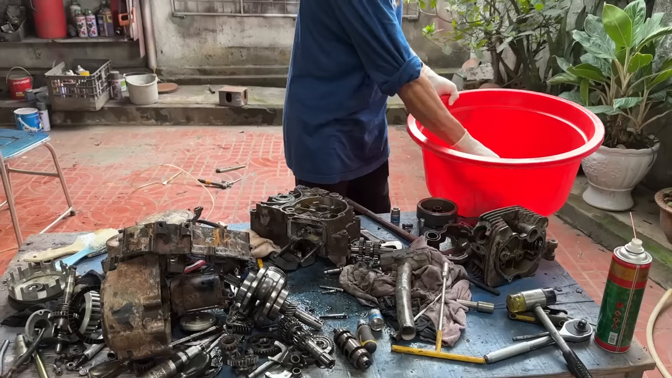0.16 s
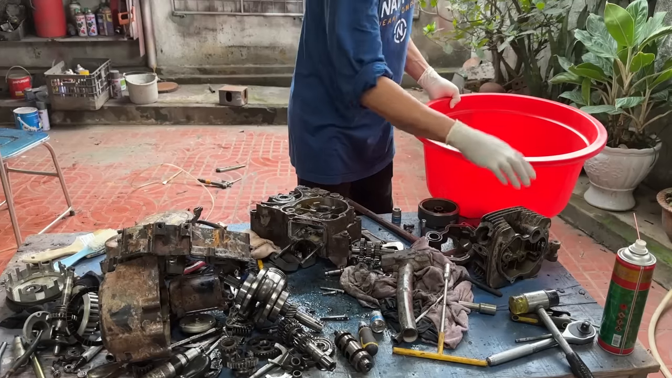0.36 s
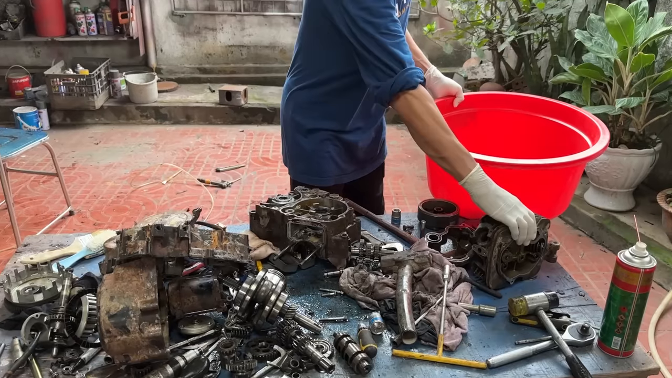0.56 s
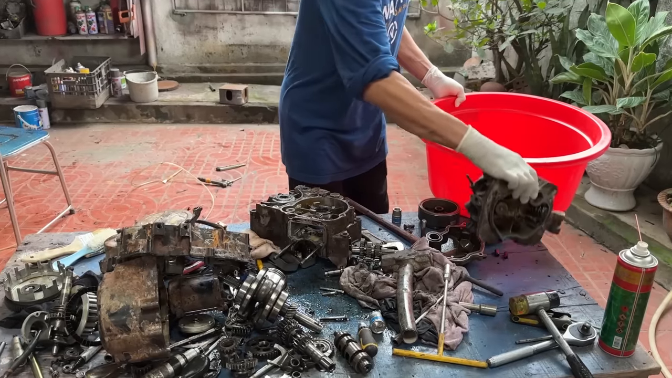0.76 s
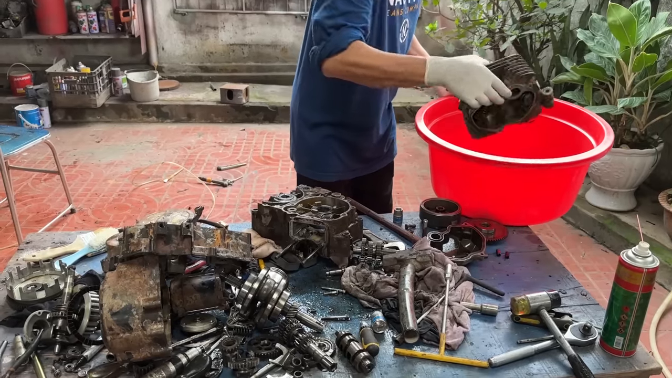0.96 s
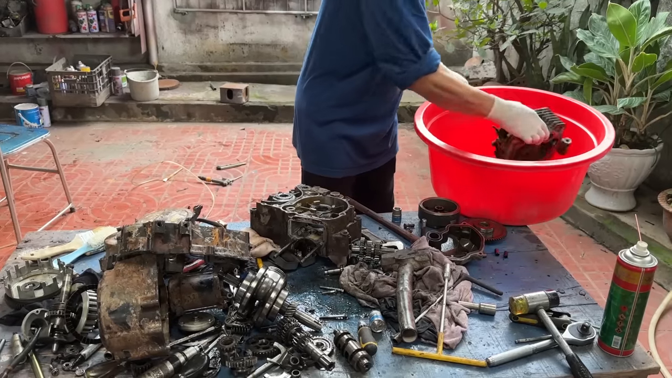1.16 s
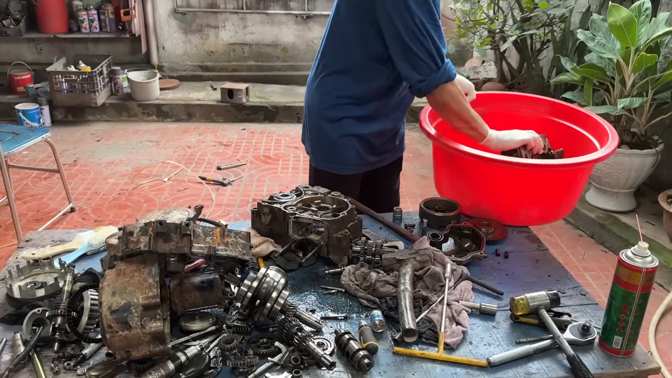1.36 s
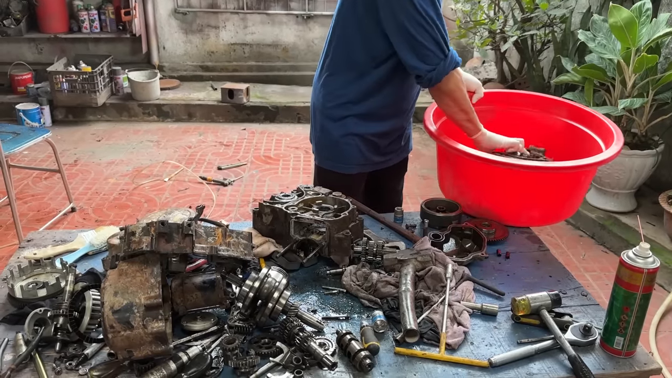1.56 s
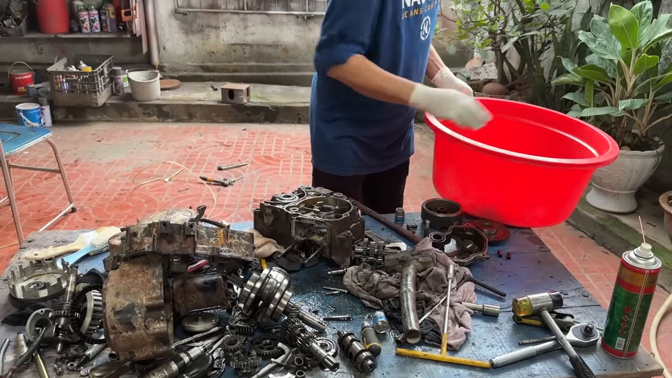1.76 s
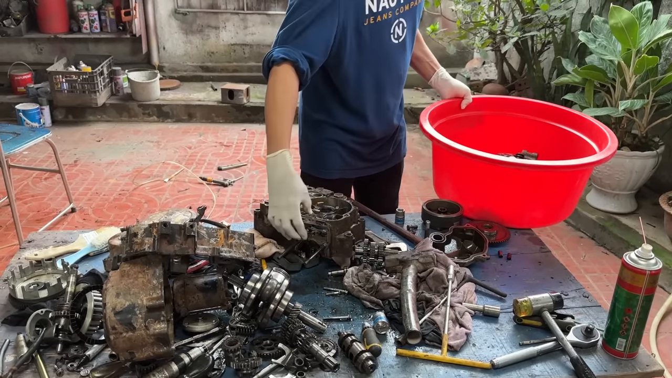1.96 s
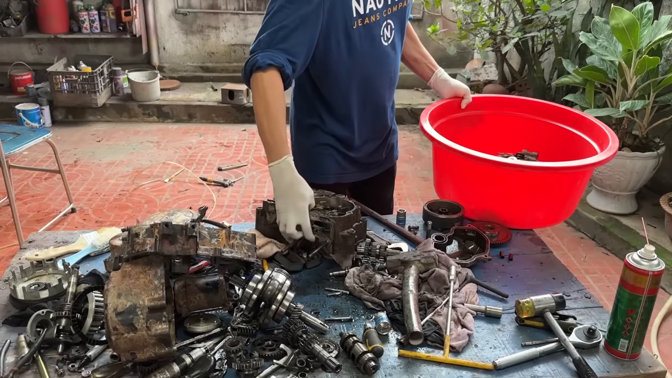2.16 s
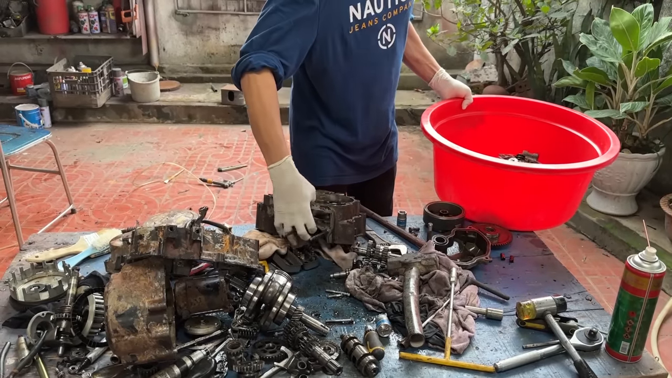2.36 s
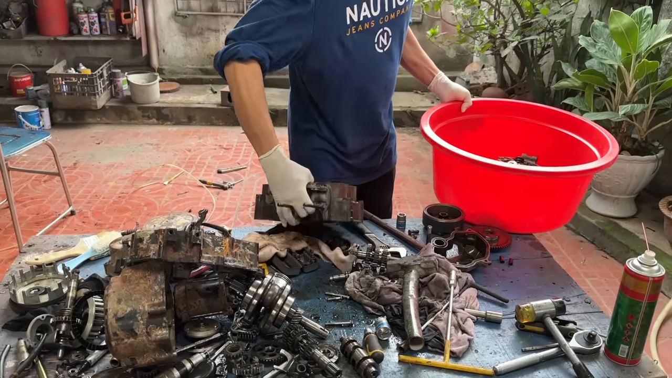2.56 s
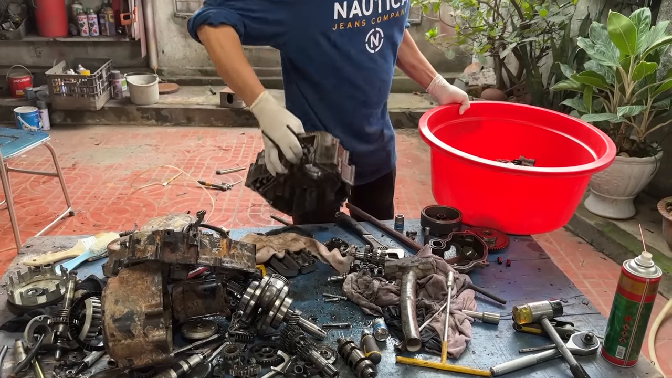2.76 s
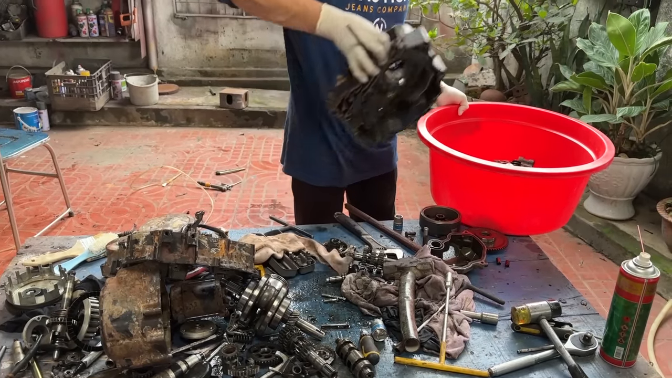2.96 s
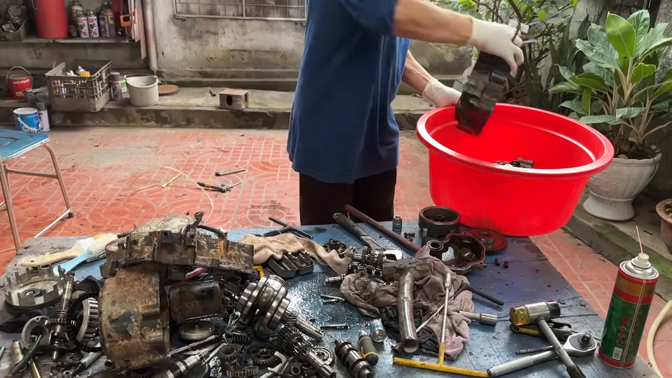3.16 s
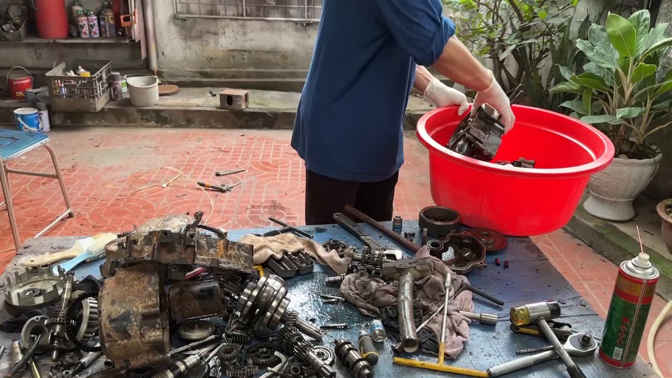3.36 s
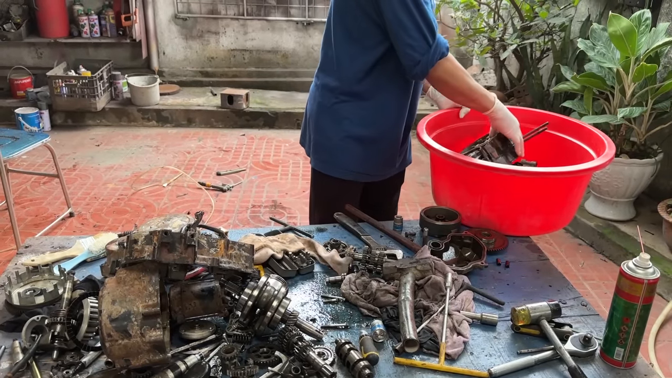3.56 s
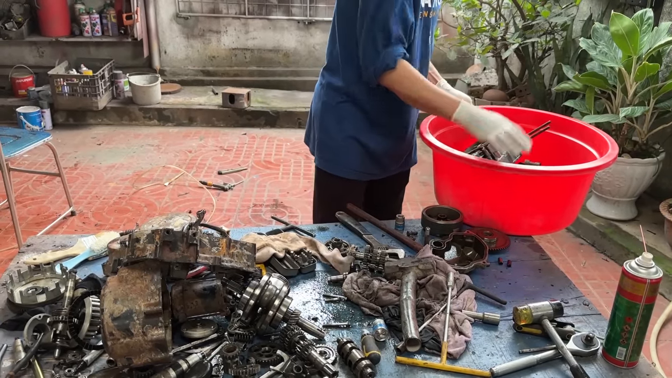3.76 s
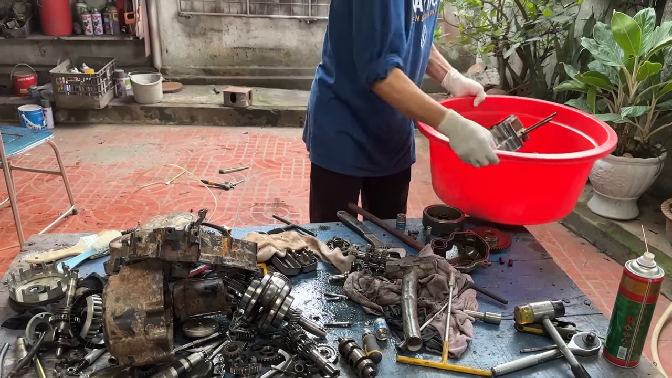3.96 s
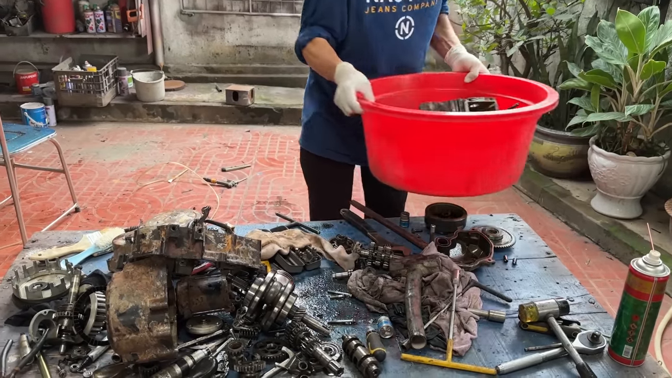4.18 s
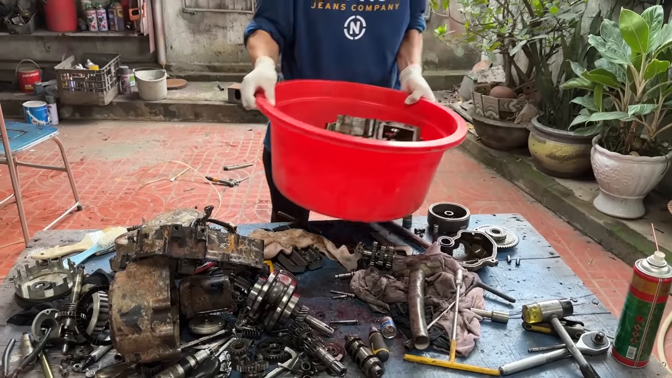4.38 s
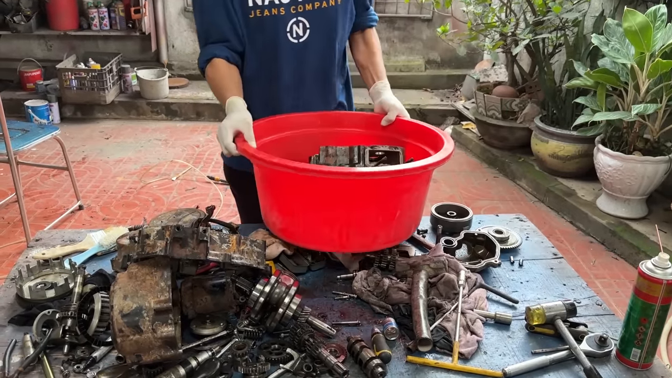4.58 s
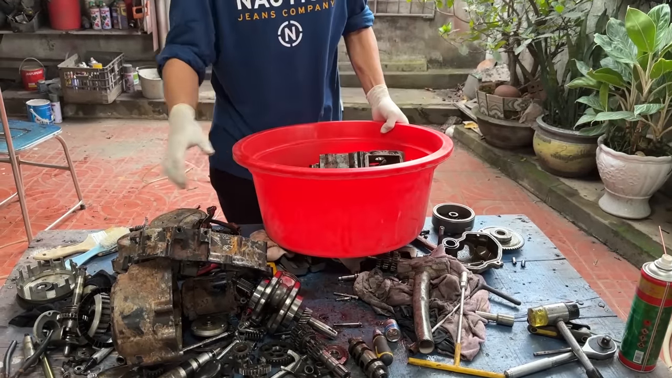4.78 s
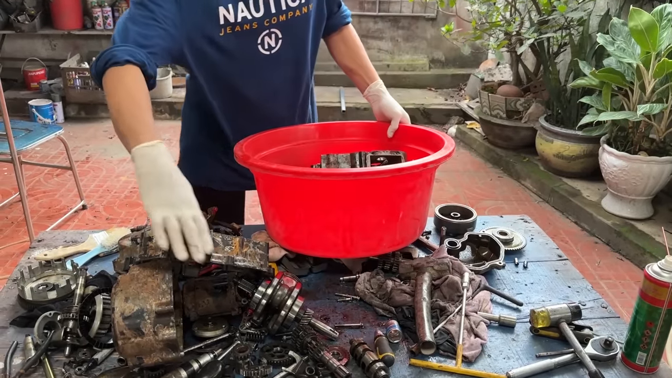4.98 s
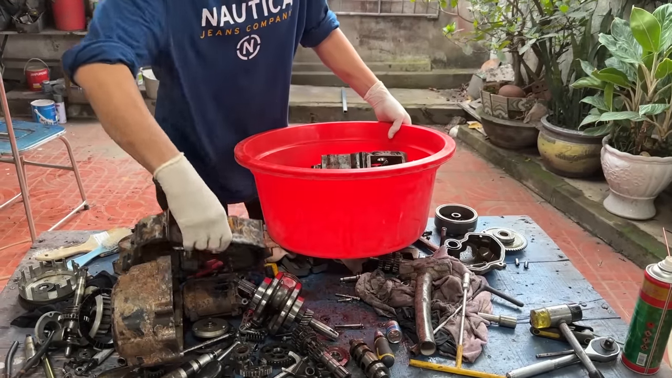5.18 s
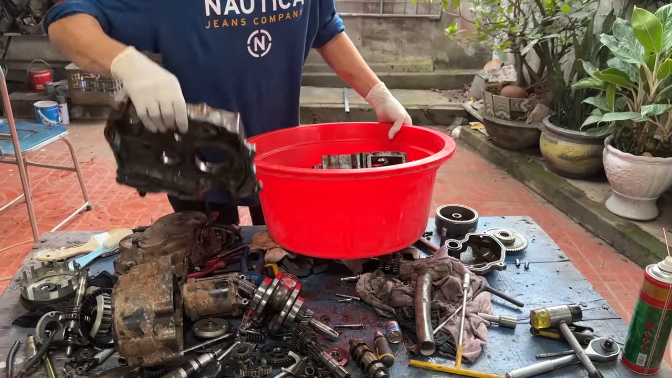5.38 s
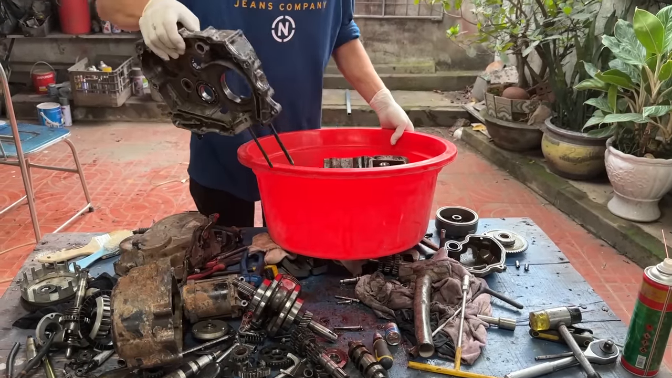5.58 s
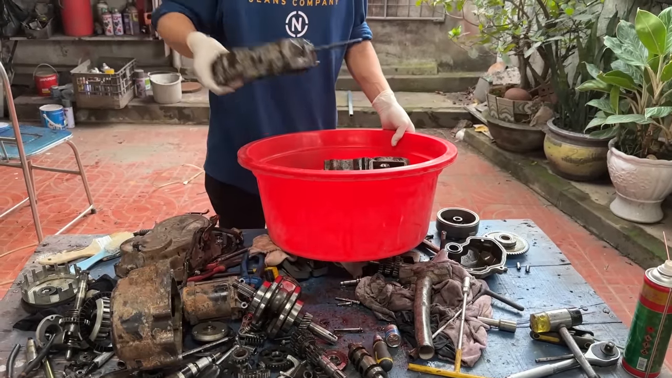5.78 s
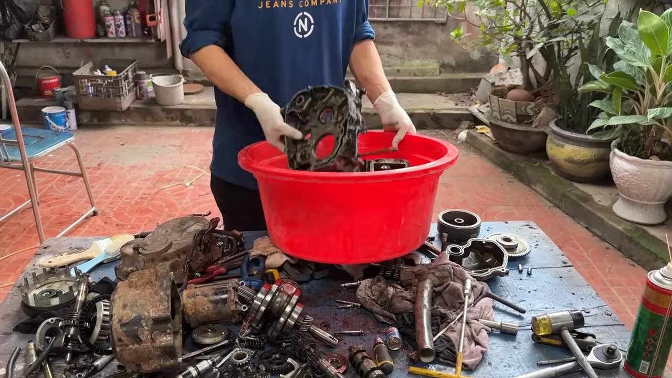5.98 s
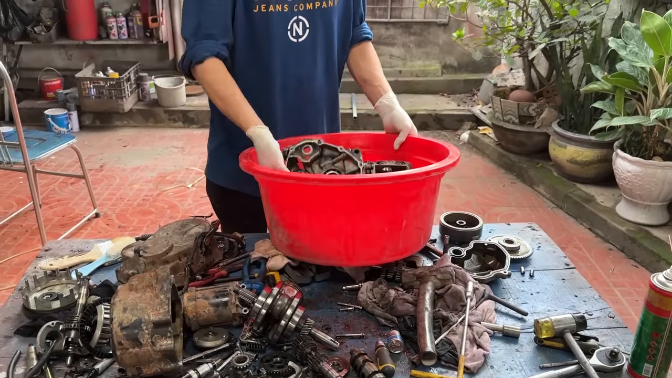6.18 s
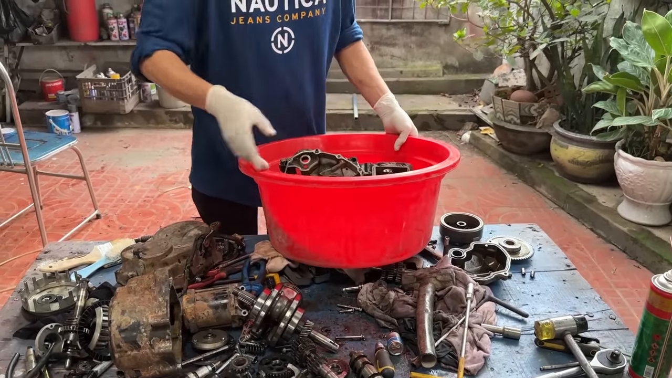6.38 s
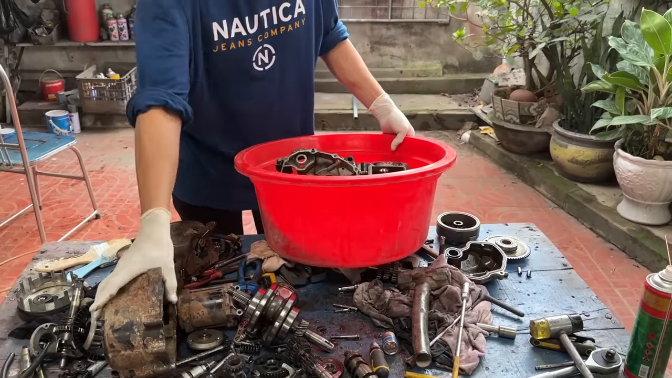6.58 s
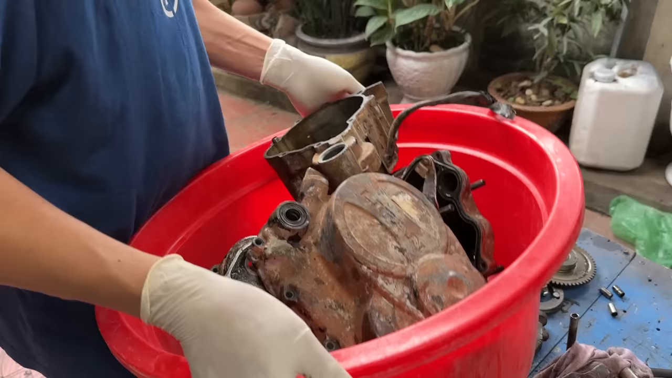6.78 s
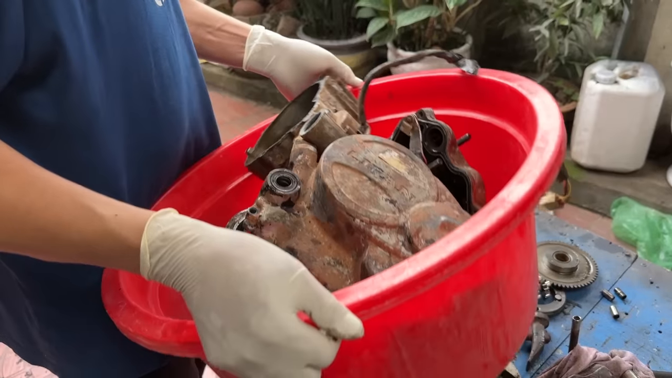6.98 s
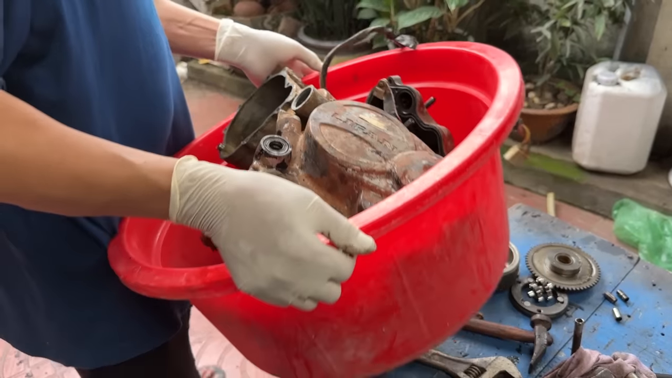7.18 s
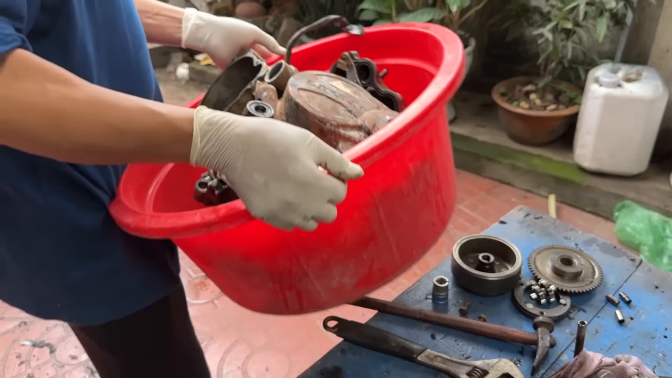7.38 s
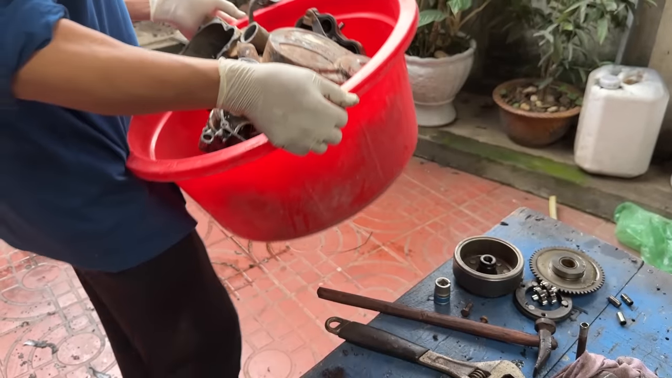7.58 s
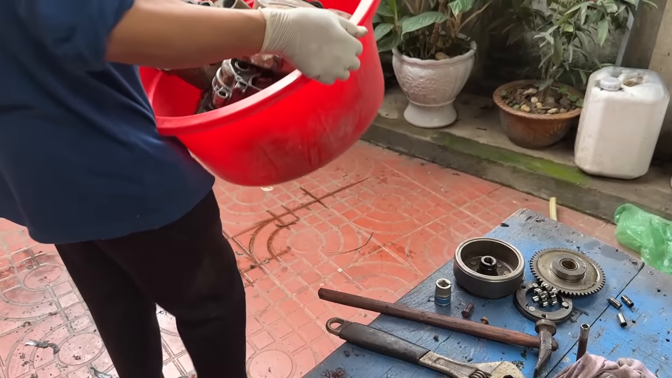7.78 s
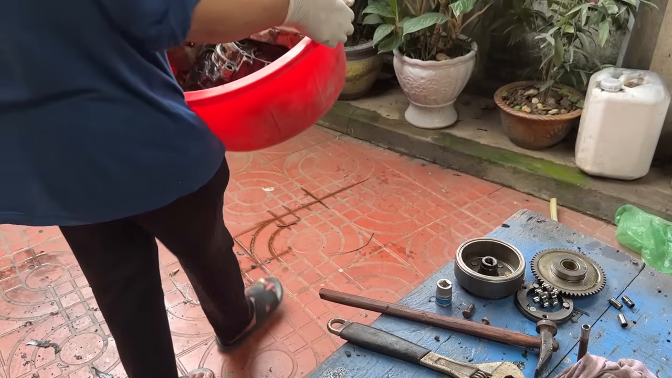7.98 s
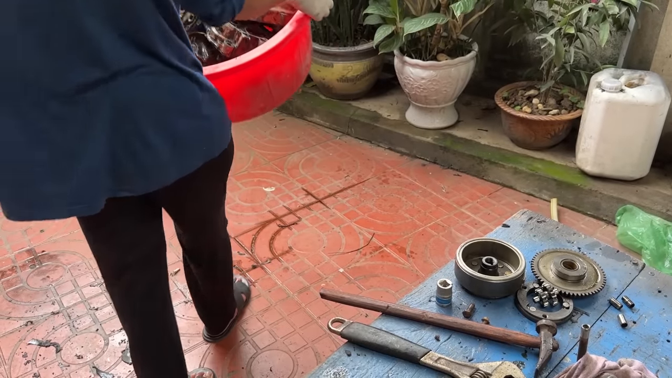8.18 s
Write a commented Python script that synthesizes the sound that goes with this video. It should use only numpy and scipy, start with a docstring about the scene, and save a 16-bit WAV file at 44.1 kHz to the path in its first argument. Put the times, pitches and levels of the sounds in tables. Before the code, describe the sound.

Hard metal knocks and hollow plastic booms as engine parts are lifted from a cluttered bench into a tub outdoors, then a brief squeal and faint scuff.

```python
"""Greasy engine castings are lifted off a cluttered workbench and loaded into a plastic basin, in a walled yard.
Each blow is a noise crack plus the dense modes of cast metal; the basin booms, and a stud, a gear and covers
ring on as decaying sines. Parts scrape in runs of tiny slips, grit ticks, and far birds chirp as wavering tones.
Near the end a thin squeal of beating tones begins; at 6.825 s the scene cuts from yard air to low rumbling noise
over a thin hiss, as also heard at the very start. Blows go on briefly, then a sole scuffs the paving."""
import sys
import numpy as np
from scipy import signal
from scipy.fft import rfft, irfft, next_fast_len
from scipy.io import wavfile
from scipy.ndimage import uniform_filter1d

SR = 44100
rng = np.random.default_rng(int(sys.argv[2]) if len(sys.argv) > 2 else 0)


def transcribe(signal):
    """Save signal, clipped to [-1, 1], as a 16-bit WAV file at the path in sys.argv[1]."""
    frames = np.atleast_2d(signal).T
    limited = np.clip(frames, -1, 1)
    pcm = np.round(limited * 32767).astype(np.int16)
    wavfile.write(sys.argv[1], SR, pcm)


N = 363366
T = np.arange(SR * 3 // 8) / SR  # clock of one blow, in seconds
LN_60_DB = np.log(1000)
DROPOUT_START_S, DROPOUT_END_S = 0.133, 0.16


def amp(db):
    """Decibels to gain."""
    return 10 ** (np.asarray(db) / 20)


def evened(x):
    """Scales to rms 1."""
    return x / np.sqrt(np.mean(x ** 2) + 1e-20)


def read(points, hz):
    """Reads a table on a log-frequency axis."""
    f, value = np.transpose(points)
    return np.interp(np.log(hz + 1), np.log(f + 1), value)


def level(events, rise_s, fall_s):
    """Gain from rows of start_s, length_s, level_db: each rises, holds, then falls 60 dB in fall_s."""
    t = np.arange(N) / SR
    gains = []
    for start_s, length_s, level_db in events:
        rise = np.clip((t - start_s) / rise_s, 0, 1)
        fall = np.exp(-LN_60_DB * np.maximum(t - start_s - length_s, 0) / fall_s)
        gains.append(amp(level_db) * rise * fall)
    return np.max(gains, axis=0)


def fade(t60):
    """Exponential decay over the length of one blow, falling 60 dB in t60 seconds."""
    return np.exp(-LN_60_DB * T / np.maximum(t60, 1e-3))


def add(mix, start_s, sound):
    """Mixes a mid-side sound in at start_s."""
    part = mix[:, max(round(start_s * SR), 0):][:, :sound.shape[1]]
    part += sound[:, :part.shape[1]]


def coloured(x, points):
    """Filters by a spectrum with rows of pitch_hz, level_db."""
    size = next_fast_len(N + SR // 2)
    gain = amp(read(points, np.fft.rfftfreq(size, 1 / SR)))
    return irfft(rfft(x, size) * gain, size)[..., :N]


def wander(count, size):
    """Smooth chance of rms 1 that changes over about size samples."""
    smooth = uniform_filter1d(rng.standard_normal(count), size)
    return evened(uniform_filter1d(smooth, size))


# air of the yard: pitch_hz, relative level_db per Hz
YARD_COLOUR = [(30, -45.5), (64, -11.5), (138, -4), (170, -13), (437, -19), (700, -25.5), (1760, -34),
               (3220, -34.5), (6900, -39.5), (14400, -38), (16000, -54)]
# level of the yard air, before it drifts: start_s, level_db
YARD_LEVEL = [(.3, -55.5), (1.15, -59.5), (2.1, -55.5), (3.2, -57.5), (4.8, -54.5), (6.8, -53.5)]
# spectrum of the low rumble: pitch_hz, relative level_db per Hz
RUMBLE_COLOUR = [(22, -28.5), (80, 3.5), (123, -11.5), (200, -14.5), (326, -18.5), (416, -23), (887, -25),
                 (1440, -33), (3620, -43.5), (6920, -43.5), (11000, -67.5)]
# swells of the rumble: start_s, length_s, level_db
RUMBLES = [(0, 0.11, -49.5), (6.79, 0.31, -36.5), (7.3, 0.37, -44.5), (8.06, 0.3, -45.5)]
# spectrum of the steady hiss under the rumble: pitch_hz, relative level_db per Hz
HISS_COLOUR = [(100, 19.5), (600, 3.5), (1600, 0), (3400, 2), (7000, -6), (11000, -24), (15000, -19)]
HISS_DB = -63
RUMBLE_RISE_S, RUMBLE_FALL_S = 0.019, 1.87
SCENE_CUT_S = 6.825  # from yard air to rumble and hiss


def background(drift_db=1.2):
    """Drifting noise of the yard air; at the very start and after the cut, low rumble over thin hiss instead."""
    t = np.arange(N) / SR
    air, rumble, hiss = (evened(coloured(rng.standard_normal((2, N)), colour))
                         for colour in (YARD_COLOUR, RUMBLE_COLOUR, HISS_COLOUR))
    air_db = np.interp(t, *np.transpose(YARD_LEVEL)) + drift_db * wander(N, size=3000)
    rumbling = rumble * level(RUMBLES, RUMBLE_RISE_S, RUMBLE_FALL_S) + amp(HISS_DB) * hiss
    return np.where((t > DROPOUT_START_S) & (t < SCENE_CUT_S), air * amp(air_db), rumbling)


def casting(ring_s, spread, count=380):
    """The crowded modes of an irregular casting, each dying at its own speed."""
    even_hz = np.linspace(np.sqrt(170), np.sqrt(16000), count) ** 2
    hz = even_hz * rng.uniform(.97, 1.03, count)
    t60 = ring_s * np.exp(spread * rng.standard_normal(count))
    turns = hz[:, None] * T + rng.random((count, 1))
    return np.sin(2 * np.pi * turns) * fade(t60[:, None])


# centres of thud, knock, clank and tick: pitch_hz
COLOUR_HZ = [430, 1100, 3100, 9400]
# a soft contact loses the treble above SOFT_HZ; full hardness lifts that corner by HARD_OCTAVES
SOFT_HZ, HARD_OCTAVES, ROLLOFF = 681, 4.575, 4.74


def contact(colour_db, strength_db, hardness):
    """Thud, knock, clank and tick (dB) of one blow: the harder the contact, the more treble it keeps."""
    corner_hz = SOFT_HZ * 2 ** (HARD_OCTAVES * hardness)
    softening_db = 10 * np.log10(1 + (np.array(COLOUR_HZ) / corner_hz) ** ROLLOFF)
    return strength_db + np.array(colour_db) - softening_db


BAND_EDGES = np.geomspace(120, 16000, 13)  # Hz
BANDS = [(np.sqrt(lo * hi), signal.butter(2, [lo, hi], "band", fs=SR, output="sos"))
         for lo, hi in zip(BAND_EDGES, BAND_EDGES[1:])]


def blow(modes, colour_db, crack_s, crack_db, rise_cycles, bass_cut_db, hollow_db):
    """A crack of contact noise plus the casting's modes, randomly weighted as by the spot struck."""
    # mid and side each get their own mix of modes
    ring = rng.standard_normal((2, len(modes))) @ modes / np.sqrt(len(modes) / 2)
    crack = amp(crack_db) * rng.standard_normal((2, len(T))) * fade(crack_s)
    bass = (COLOUR_HZ[0] / 3, colour_db[0] + bass_cut_db)
    # between the thud of the support and the knock of the metal
    hollow = (np.sqrt(COLOUR_HZ[0] * COLOUR_HZ[1]), np.mean(colour_db[:2]) + hollow_db)
    points = sorted([bass, hollow, *zip(COLOUR_HZ, colour_db)])
    out = np.zeros((2, len(T)))
    backwards = (ring + crack)[:, ::-1]
    for hz, band_pass in BANDS:
        # filtered backwards, then forwards, so the filter adds no delay
        band = signal.sosfilt(band_pass, signal.sosfilt(band_pass, backwards)[:, ::-1])
        swell = np.minimum(T * min(hz, COLOUR_HZ[1]) / rise_cycles, 1)  # the bass builds more slowly
        band = band * np.sin(np.pi / 2 * swell) ** 2
        attack = np.sqrt(np.mean(band[:, :700] ** 2, axis=1, keepdims=True))  # strength of the first 16 ms
        out += band * (amp(read(points, hz)) / attack / np.sqrt(2))
    return out


# metal knocking on metal and on the bench: start_s, strength_db, hardness (0-1),
# thud_db (the support's thud, added to its share of the blow)
METAL_BLOWS = [(0.001, -40.5, 0.38, 10.5), (0.174, -34.5, 0.21, -10.5), (0.727, -51.5, 0.36, -29),
               (1.287, -42, 0.35, -9), (1.718, -39.5, 0.16, -5), (1.847, -49, 0.62, 0),
               (2.2, -23.5, 0.25, -4), (2.215, -30.5, 0.76, 0), (2.272, -27, 0.97, -0.5),
               (2.369, -37.5, 0.77, -8), (2.773, -24.5, 0.43, -3), (2.798, -27.5, 0.17, -2.5),
               (3.359, -49, 0.6, -6), (3.429, -43.5, 0.58, -8), (4.019, -32.5, 0.32, -3),
               (4.587, -33, 0.28, -10), (4.675, -29.5, 0.68, 3.5), (4.699, -33, 0.68, -11.5),
               (5.174, -41.5, 0.87, 9), (5.202, -40, 0.76, 12.5), (5.302, -34.5, 0.77, 4),
               (5.511, -19.5, 0, -2.5), (5.53, -22, 0.54, -13), (5.62, -31.5, 0.42, -5),
               (5.669, -24.5, 0.24, -4.5), (5.681, -17.5, 0.29, -11), (6.288, -24.5, 0.52, -30),
               (6.337, -25.5, 0.28, -14), (6.593, -31, 0.07, -26), (6.657, -46, 1, -10),
               (7.028, -10.5, 0, -12), (7.059, -32.5, 0.35, 9.5)]
# thud, knock, clank and tick against strength, before softening: level_db
METAL_COLOUR_DB = [-4, -4, -4.5, -6]
GRAZE_S, GRAZE_DB = .004, -18.5  # a part grazes just before it strikes


def bench():
    """Hard, short clanks, each led by a faint graze, as parts are tipped and dragged free."""
    out = np.zeros((2, N))
    modes = casting(ring_s=0.1, spread=0.33)
    for start_s, strength_db, hardness, thud_db in METAL_BLOWS:
        thud, *metal = contact(METAL_COLOUR_DB, strength_db, hardness)
        clank = blow(modes, [thud + thud_db, *metal], crack_s=0.042, crack_db=6.5,
                     rise_cycles=1.0, bass_cut_db=-16.5, hollow_db=4.5)
        add(out, start_s - GRAZE_S, amp(GRAZE_DB) * clank)
        add(out, start_s, clank)
    return out


def ringing(modes, rise_s, spread):
    """Decaying sines from a table of modes; spread (0-1) loosens their timing, as in a soft, broad contact."""
    hz, db, t60 = np.transpose(modes)[:, :, None]
    side_turn = np.array([0, 1 / 4])[:, None, None]  # side runs a quarter cycle ahead of mid
    phase = np.clip(spread, 0, 1) * rng.random((len(modes), 1)) + side_turn
    tones = amp(db) * np.sin(2 * np.pi * (hz * T + phase)) * fade(t60)
    return tones.sum(1) * (1 - np.exp(-T / rise_s)) * np.array([[1], [.5]])


ROCK_S, ROCK_HARDNESS = 0.039, 0.8  # delay of the rock onto another edge, and the share of hardness kept
SETTLE_S, SETTLE_DB, SETTLE_DB_PER_S = 0.14, -20.5, 105


def landing(start_s, strength_db, hardness, rock_db, count):
    """One casting's contacts (start_s, strength_db, hardness): it strikes, rocks back and settles, later is fainter."""
    softer = hardness * ROCK_HARDNESS
    contacts = [(start_s, strength_db, hardness), (start_s + ROCK_S, strength_db + rock_db, softer)]
    for lag_s in SETTLE_S * rng.random(count):
        contacts.append((start_s + lag_s, strength_db + SETTLE_DB - SETTLE_DB_PER_S * lag_s, softer))
    return contacts


# castings landing and shifting in the basin: start_s, strength_db, hardness (0-1),
# boom_db (against strength), rock_db (rocking back, against strength)
BASIN_BLOWS = [(0.058, -24.5, 0.15, -9.5, -30), (0.212, -40.5, 0.48, 5, -9), (0.233, -20, 0.27, -6, -12),
               (1.325, -24.5, 0.23, -13, -6.5), (1.569, -17.5, 0.27, -19, -1), (1.784, -34, 0, -11.5, -14),
               (3.472, -25, 0.37, -1, -11), (3.585, -22, 0.52, -5.5, -29.5), (4.117, -22, 0.46, 3, -5),
               (4.159, -24, 0.24, 2.5, -17), (4.528, -23, 0.3, -12, -6), (5.484, -9.5, 0.51, -12.5, -8),
               (6.224, -21, 0.35, -13.5, -4), (6.263, -17.5, 0.57, -20.5, -3), (6.416, -29, 0.42, -9, -39),
               (7.047, -17, 0.28, -7.5, -6)]
# thud, knock, clank and tick against strength, before softening: level_db
BASIN_COLOUR_DB = [-4.5, -12.5, -13, -3]
# modes of the loaded basin: pitch_hz, level_db, t60_s
BASIN = [(198.5, 2.5, 0.15), (269.2, -1.5, 0.24), (332.3, 1, 0.1), (440.7, 1.5, 0.13), (502, 1, 0.064),
         (605, -8.5, 0.0097)]


def basin():
    """The plastic damps the castings and booms on its own low modes under their weight."""
    out = np.zeros((2, N))
    modes = casting(ring_s=0.084, spread=0.24)
    for start_s, strength_db, first_hardness, boom_db, rock_db in BASIN_BLOWS:
        for s, db, hardness in landing(start_s, strength_db, first_hardness, rock_db, count=2):
            colour_db = contact(BASIN_COLOUR_DB, db, hardness)
            add(out, s, blow(modes, colour_db, crack_s=0.13, crack_db=-5.0,
                             rise_cycles=2.8, bass_cut_db=-19.5, hollow_db=-4.0))
            add(out, s, amp(db + boom_db) * ringing(BASIN, rise_s=0.00083, spread=0.92))
    return out


# parts sliding over each other and the plastic: start_s, length_s, level_db
SLIDES = [(.18, 0.13, -45.5), (1.325, 0.059, -39.5), (1.6, 0.057, -40), (3.44, 0.28, -50.5),
          (3.84, 0.19, -49.5), (3.95, 0.065, -38), (4.078, 0.098, -31.5), (4.53, 0.14, -41),
          (4.8, 0.15, -49.5), (5.175, 0.098, -51), (6.59, 0.21, -50.5), (7.06, 0.056, -45)]
# spectrum of sliding: pitch_hz, relative level_db per Hz
SLIDE_COLOUR = [(80, -25.5), (200, -0.5), (330, 4.5), (580, -4.5), (800, -5), (2400, -15), (3800, -27),
                (15000, -37)]
SLIDE_RISE_S, SLIDE_FALL_S = 0.007, 0.19
SLIPS_PER_S = 2500  # on average


def sliding(uneven_db=3.5, groan_db=-5, pressure_db=4.0):
    """A dense run of tiny slips under uneven pressure as parts scrape; they also make the basin groan."""
    slip_sizes = amp(uneven_db * np.minimum(rng.exponential(1, N), 4))
    slips = (rng.random(N) < SLIPS_PER_S / SR) * slip_sizes
    slip_decay = np.exp(-1 / (0.003 * SR))  # each slip dies with a 3 ms time constant
    grit = signal.lfilter([1], [1, -slip_decay], slips) * rng.standard_normal((2, N))
    groan = signal.oaconvolve(grit, ringing(BASIN, rise_s=0.0017, spread=1.0), axes=1)[:, :N]
    pressure = level(SLIDES, SLIDE_RISE_S, SLIDE_FALL_S) * amp(pressure_db * np.tanh(wander(N, size=500)))
    return (evened(coloured(grit, SLIDE_COLOUR)) + amp(groan_db) * evened(groan)) * pressure


# modes of the parts that ring on, one table each: pitch_hz, level_db, t60_s
STUD = [(750, -35, .75), (1635, -21, .25), (2580, -5, .115), (2593, -4, .115), (2640, -13, .11),
        (3085, -24, .23)]
CYLINDER = [(2613, 7, 0.07), (2656, 10, 0.07), (3070, 3, .11), (5362, -9, 0.15), (6600, -14, .1),
            (6880, -12, .13)]
GEAR = [(9070, 2, 0.23), (8760, -3, .14), (14700, -1.5, 0.12)]
COVER = [(1488, 11.5, 0.16), (1576, 4, 0.13), (2070, -4, 0.072), (2335, 1, 0.28), (3590, 1, 0.13),
         (4860, -7.5, 0.2)]
CASE = [(2295, 0, .22), (2730, -3, .08), (4340, -6, .1), (6724, -9, .11)]
CRANKCASE = [(890, 0, .09), (1640, -1, .1), (2560, -11, .13), (3695, -16, .2)]
PIN = [(4100, 0.012, 0.077)]
HELD_PART = [(990, 0, 0.03)]  # damped by the gloved hand
HOUSING = [(915, -0.62, 0.24), (1000, -1.1, 0.2)]
LOOSE_PART = [(1162, 7.5, 0.028), (1502, 7, 0.037), (4100, -12, 0.038)]
BASIN_FLOOR = [(342, -8.5, 0.065), (492, 6, 0.082), (538, -9.5, 0.28)]
BENCH_TOP = [(115.8, 0.015, 0.19)]
# parts set ringing by the blows: start_s, modes of the part, level_db
RINGS = [(0.235, BASIN_FLOOR, -15), (0.246, BENCH_TOP, -26.5), (1.324, BASIN_FLOOR, -25.5),
         (1.57, HOUSING, -24), (1.846, HELD_PART, -25.5), (1.847, PIN, -49), (2.179, HELD_PART, -20.5),
         (2.272, GEAR, -36.5), (2.271, PIN, -27), (2.272, CRANKCASE, -22.5), (2.369, CRANKCASE, -29),
         (2.774, CRANKCASE, -25), (3.586, CYLINDER, -25), (4.02, HELD_PART, -13.5), (4.073, STUD, -33.5),
         (4.117, STUD, -5.5), (4.145, GEAR, -31.5), (4.157, STUD, -23), (4.675, LOOSE_PART, -19.5),
         (4.678, BASIN, -27), (5.301, CASE, -29.5), (5.484, BENCH_TOP, -22), (5.485, COVER, -33.5),
         (5.536, BASIN, -19.5), (6.224, BASIN_FLOOR, -25.5), (6.264, COVER, -25.5),
         (6.31, BASIN_FLOOR, -20), (7.045, BENCH_TOP, -14.5)]
# share of a high ring that flutters (0-1, less below the clank), and how soon it sets in
CHATTER, CHATTER_RISE_S = .7, .03


def ringing_parts():
    """Parts ring on a few modes, the high ones fluttering most as they chatter; bench top and basin drum."""
    out = np.zeros((2, N))
    for start_s, modes, level_db in RINGS:
        for mode in modes:
            share = CHATTER * min(mode[0] / COLOUR_HZ[2], 1)
            chatter = share * (1 - np.exp(-T / CHATTER_RISE_S))
            flutter = np.sqrt(1 - chatter ** 2) + chatter * wander(len(T), size=260)
            add(out, start_s, amp(level_db) * flutter * ringing([mode], rise_s=0.0011, spread=0.18))
    return out


# light ticks: start_s, level_db, pitch_hz (centre)
TICKS = [(0.365, -41.5, 9400), (.424, -49, 4400), (.614, -46, 13000), (4.908, -42, 3000),
         (6.397, -34, 4160), (6.76, -46, 7000)]


def ticks(ring_s=0.014, width=1.29):
    """Tiny clicks of grit and small loose pieces: decaying noise in a band from pitch / width to pitch * width."""
    out = np.zeros((2, N))
    for start_s, level_db, pitch_hz in TICKS:
        band_pass = signal.butter(2, [pitch_hz / width, pitch_hz * width], "band", fs=SR, output="sos")
        click = signal.sosfilt(band_pass, rng.standard_normal((2, len(T))))
        add(out, start_s, amp(level_db) * evened(click) * fade(ring_s))
    return out


# faint far chirps, before their echo: start_s, level_db
CHIRPS = [(.55, -66), (6.062, -61)]


def birds(hz=5750, length_s=0.065):
    """Short thin chirps from far off: a wavering sine that swells and fades."""
    out = np.zeros((2, N))
    count = int(length_s * SR)
    for start_s, level_db in CHIRPS:
        turns = np.cumsum(hz * (1 + 0.016 * wander(count, size=80))) / SR
        tone = np.sin(2 * np.pi * (turns + rng.random((2, 1))))
        add(out, start_s, amp(level_db) * tone * np.hanning(count))
    return out


# level of the thin squeal's main tone, before its echo: start_s, level_db
SQUEAL = [(6.82, -68), (6.861, -27.5), (6.94, -25.5), (7.01, -48), (7.06, -40), (7.168, -52), (7.27, -76)]
SQUEAL_HZ = 6575


def wavering_phase(hz, waver):
    """Phase in radians of a tone whose pitch wavers by chance, with side a fifth of a cycle ahead of mid."""
    turns = np.cumsum(hz * (1 + waver * wander(N, size=150))) / SR
    return 2 * np.pi * (turns + np.array([[0], [.2]]))


def squeal(waver=0.00345, upper_hz=6690, upper_db=-12, octave_db=-9):
    """A wavering friction tone beats with a weaker one just above; its octave grows as it gets louder."""
    s, db = np.transpose(SQUEAL)
    gain = amp(np.interp(np.arange(N) / SR, s, db, left=-np.inf, right=-np.inf))
    main = wavering_phase(SQUEAL_HZ, waver)
    upper = wavering_phase(upper_hz, waver)
    octave = amp(octave_db) * np.sqrt(gain / gain.max()) * np.sin(2 * main)
    return gain * (np.sin(main) + amp(upper_db) * np.sin(upper) + octave)


# a sandal scuffs the tiles: start_s, length_s, level_db
SCUFF = (7.932, 0.013, -52.5)
# spectrum of the scuff: pitch_hz, relative level_db per Hz
SCUFF_COLOUR = [(2500, -31), (3700, 11.5), (8000, -2), (11000, -35.5)]


def scuff(rise_s=0.0049, fall_s=0.05):
    """A short, bright rub of a sole on the paving, made of filtered noise."""
    rub = evened(coloured(rng.standard_normal((2, N)), SCUFF_COLOUR))
    return rub * level([SCUFF], rise_s, fall_s)


# decay of the yard's echo, held to at least 0.05 s: pitch_hz, t60_s
ECHO_T60 = [(120, 0.72), (500, 0.3052), (1400, 0.4838), (3700, 0.46), (7000, 0.44), (13000, -0.03)]
# colour of the yard's echo: pitch_hz, level_db
ECHO_DB = [(100, -18.5), (400, -9), (1200, -10.5), (4000, -11.5), (12000, -0.5)]


def echo(x, delay_s=0.014):
    """Scattered returns of the mid from walls and paving; each band dies at its own speed."""
    t = np.arange(SR) / SR
    scattered = rng.standard_normal((2, SR)) * (rng.random((2, SR)) < .1)
    taps = scattered * np.clip(t / delay_s - .5, 0, 1)  # silent for half of delay_s, full at 1.5 times it
    hz, at, z = signal.stft(evened(taps), SR, nperseg=256)
    t60 = np.maximum(read(ECHO_T60, hz), .05)[:, None]
    even_energy = np.sqrt(2 * LN_60_DB / (t60 * SR))  # a longer tail is no stronger in total
    z *= np.exp(-LN_60_DB * at / t60) * amp(read(ECHO_DB, hz))[:, None] * even_energy
    response = signal.istft(z, SR, nperseg=256)[1]
    return signal.fftconvolve(x[:1], response, axes=1)[:, :N]


# stereo width: pitch_hz, level_db (gain of the side)
WIDTH = [(60, -23), (180, -20.5), (350, -12.5), (700, -8), (1400, -3), (3000, -1.5), (6000, -2),
         (13000, -1.5)]
# stereo tilt: pitch_hz, level_db (left minus right gain)
TILT = [(300, -0.5), (1400, 0), (3000, 0), (8000, 5.5), (14000, 7)]


def scene():
    """All sources as mid and side, then left and right with the bass near mono."""
    blows = basin() + bench() + sliding() + ticks()
    rings = ringing_parts()
    far = squeal() + birds()
    near = blows + rings + echo(blows + amp(-2.5) * rings)  # ringing parts lie low, screened from the walls
    # a high-pass at 75 Hz keeps deep bass out of blows and rings
    near = signal.sosfilt(signal.butter(2, 75, "high", fs=SR, output="sos"), near)
    mid, side = near + far + amp(10) * echo(far) + scuff() + background()
    side = coloured(side, WIDTH)
    left, right = (coloured(mid + sign * side, [(hz, sign * db / 2) for hz, db in TILT]) for sign in (1, -1))
    return np.array([left, right])


def record(dry):
    """The sound drops out for an instant near the start; then a low-pass removes the top treble."""
    t = np.arange(N) / SR
    audible = (t < DROPOUT_START_S) | (t > DROPOUT_END_S)
    live = uniform_filter1d(1. * audible, size=40)  # softens the edges
    low_pass = signal.firwin(255, 16200, window=("kaiser", 9), fs=SR)  # corner in Hz
    return signal.oaconvolve(dry * live, low_pass[None], "same")


dry = scene()
out = record(dry)
transcribe(out)
```